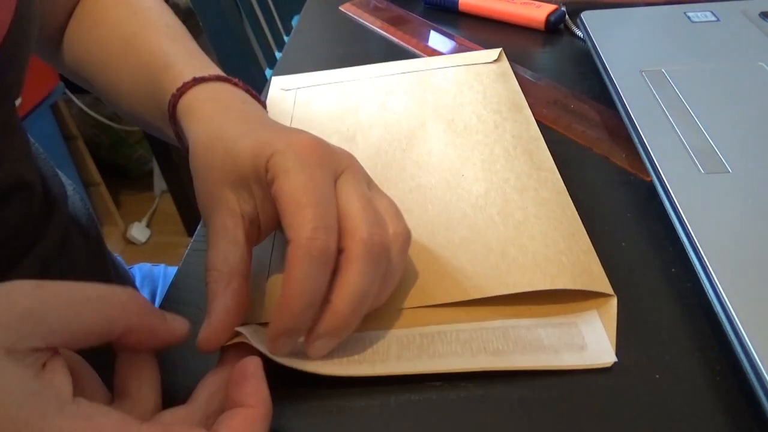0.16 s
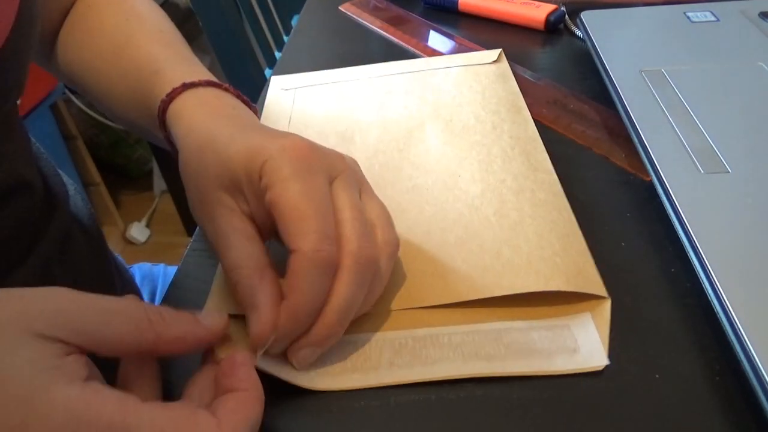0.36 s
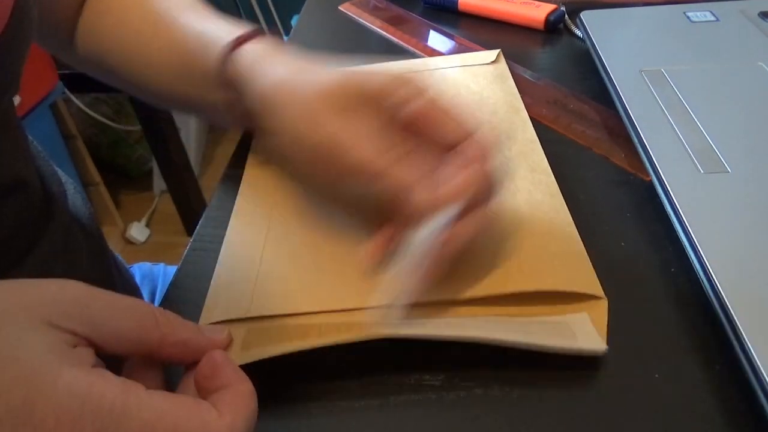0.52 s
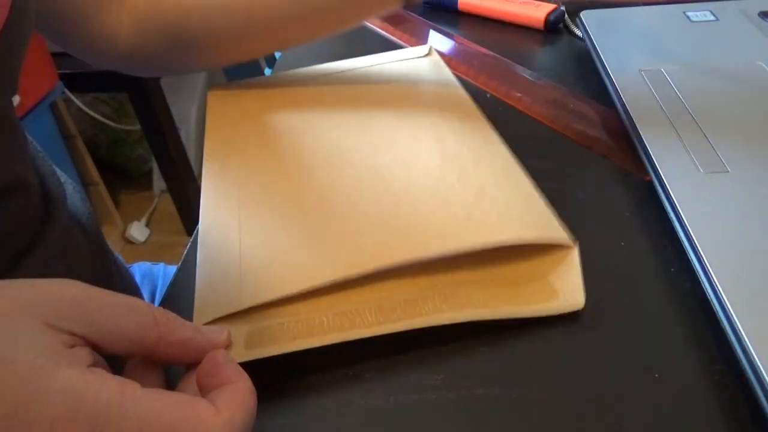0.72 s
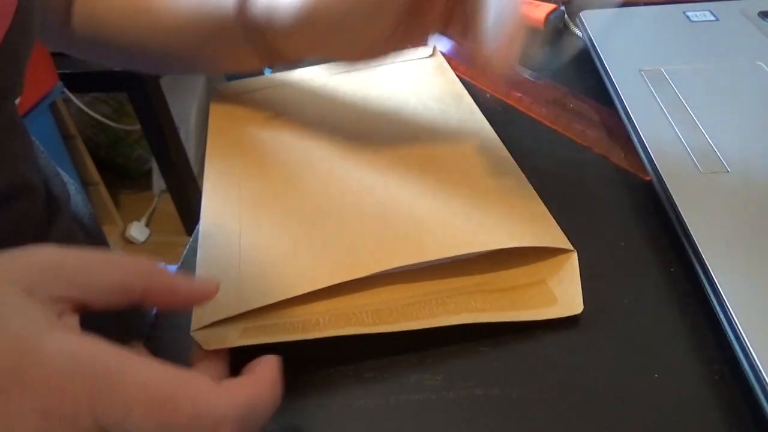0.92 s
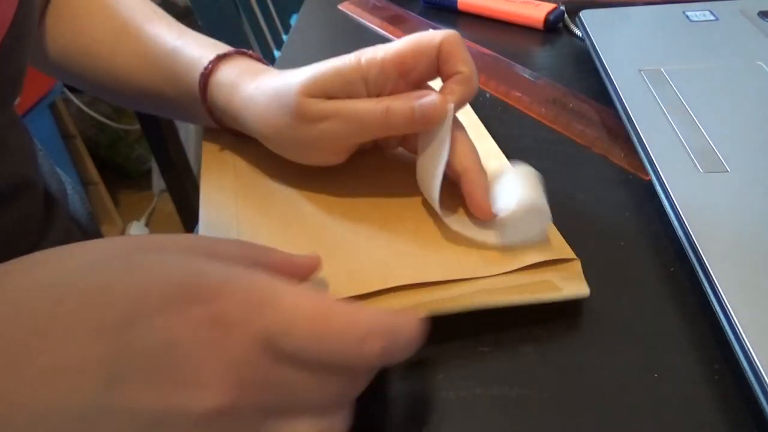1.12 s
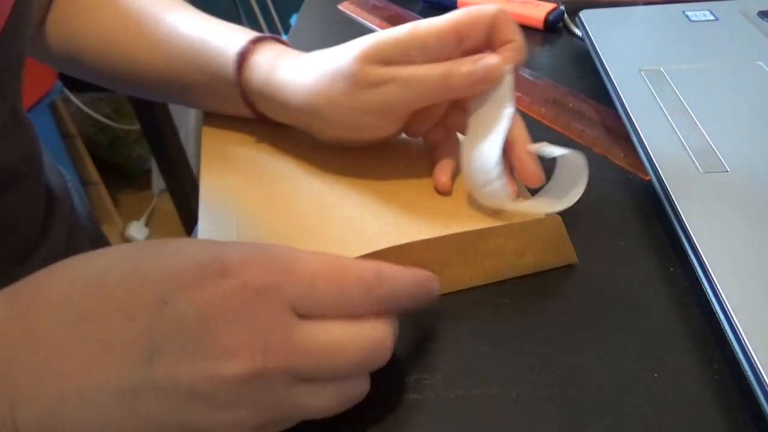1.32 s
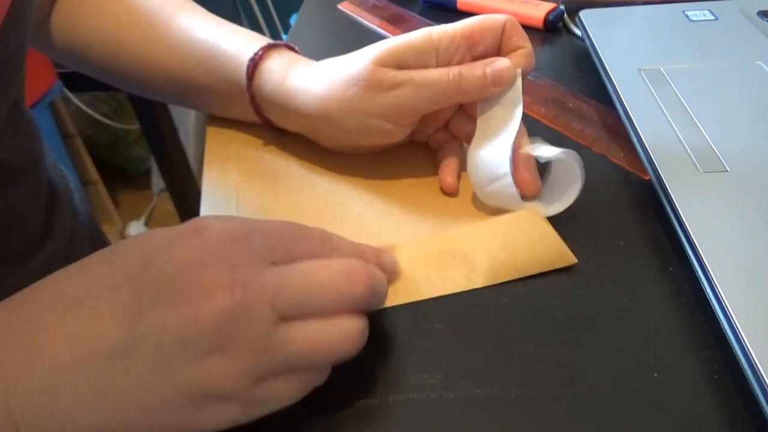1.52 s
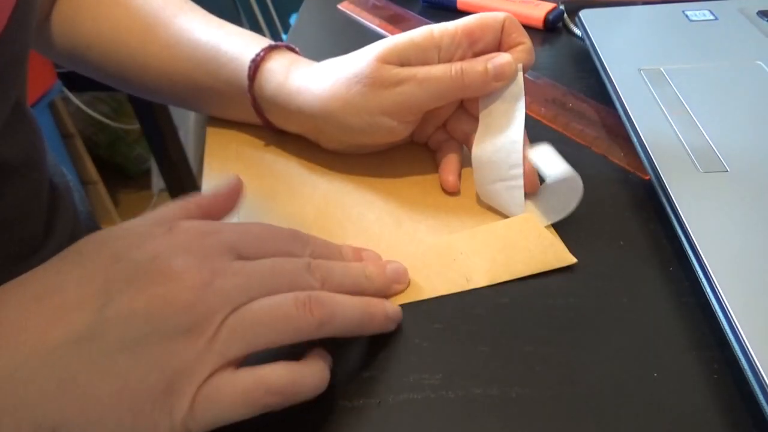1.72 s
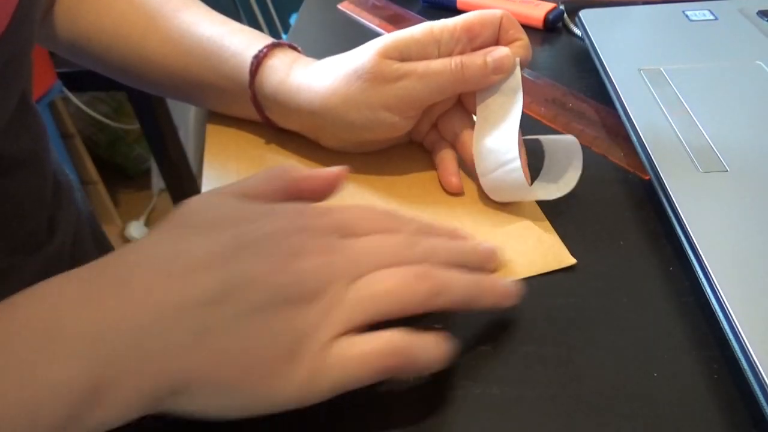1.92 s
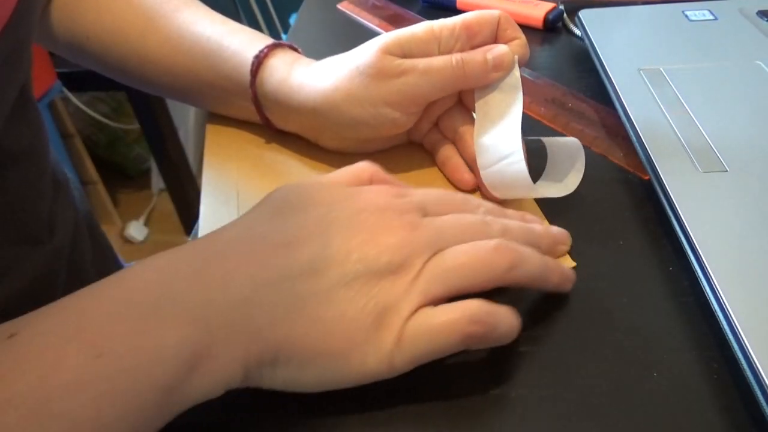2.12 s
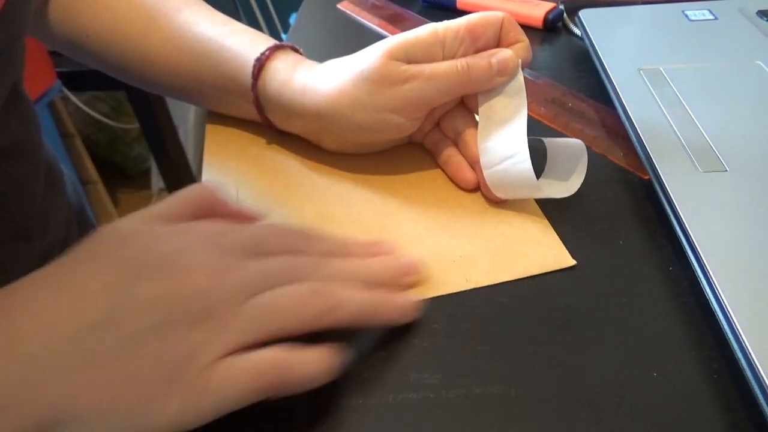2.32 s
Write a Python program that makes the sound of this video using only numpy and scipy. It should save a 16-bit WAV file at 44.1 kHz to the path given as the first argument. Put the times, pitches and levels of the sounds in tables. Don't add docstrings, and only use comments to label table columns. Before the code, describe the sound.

Paper envelope: sticky strip torn away with a quick rasp, flap folded and rubbed smooth

```python
import sys
import numpy as np
from scipy import signal
from scipy.fft import rfft, irfft
from scipy.io import wavfile
from scipy.ndimage import uniform_filter1d

SR = 44100
rng = np.random.default_rng(int(sys.argv[2]) if len(sys.argv) > 2 else 0)


def invert_db(level):
    return 10 ** (np.asarray(level, dtype=float) / 20)


def put_to_file(sound):
    columns = np.atleast_2d(sound).T
    safe = np.clip(columns, -1, 1)
    whole_steps = np.round(safe * 32767)
    wavfile.write(sys.argv[1], SR, whole_steps.astype(np.int16))


N = 103635


def evened(x):
    return x / np.sqrt(np.mean(x ** 2) + 1e-20)


def read(points, hz):
    f, value = np.transpose(points)
    return np.interp(np.log(hz + 1), np.log(f + 1), value)


def colour(x, points):
    log_gain = np.log(invert_db(read(points, abs(np.fft.fftfreq(4096, 1 / SR)))))
    response = np.exp(np.conj(signal.hilbert(log_gain)))
    taps = np.fft.ifft(response).real[:2048]
    return signal.oaconvolve(x, taps, axes=-1)[..., :np.shape(x)[-1]]


def resonate(x, hz, width_hz):
    turn = np.exp(2j * np.pi * np.cumsum(hz * np.ones(len(x))) / SR)
    r = np.exp(-np.pi * width_hz / SR)
    return 2 * (turn * signal.lfilter([1 - r], [1, -r], x / turn)).real


def fibres(per_s, spread_db, lumps_db, lump_s, hiss_db):
    happens = rng.random(N) < per_s / SR
    size = np.minimum(rng.exponential(1, N), 2)
    hiss = rng.standard_normal(N)
    puffs = signal.lfilter([1], [1, -.94], happens * invert_db(spread_db * size)) * hiss
    pole = np.exp(-1 / (lump_s * SR))
    clumps = signal.lfilter([1], [1, -pole], rng.standard_normal(N))
    clumps = evened(signal.lfilter([1], [1, -pole], clumps))
    return evened((evened(puffs) + invert_db(hiss_db) * hiss) * invert_db(lumps_db * clumps))


def effort(rows):
    t, power = np.arange(N) / SR, 0
    for start, rise, hold, db, t60 in rows:
        attack = np.clip((t - start) / rise, 0, 1)
        fall_s = np.maximum(t - start - rise - hold, 0)
        power = power + (attack * invert_db(db - 60 * fall_s / t60)) ** 2
    return np.sqrt(power)


def stroke(rows, tone, drive):
    return effort(rows) * evened(colour(drive, tone))


# start_s, rise_s, hold_s, level_db, fall_t60_s
PEEL = [
    (.52, 0.048, 0.072, -24, 0.15),
    (.575, 0.016, 0.045, -24, 0.25),
    (.63, 0.031, 0.051, -20, 0.12),
    (.72, 0.0013, 0.0079, -30.5, 0.54),
]
# freq_hz, density_db_per_hz
PEEL_TONE = [(35, -76), (80, -39), (200, -18), (398, -11), (900, -3), (1310, 5.5), (1510, 2), (8120, 10.5),
             (16000, -12.5)]
# time_s, slips_per_s
GLUE_RATE = [(.55, 940), (.62, 1800), (.72, 2500)]
# time_s, pitch_hz
STRIP_PITCH = [(.59, 5500), (.615, 5000), (.64, 4250), (.665, 3650), (.69, 3200)]
# start_s, rise_s, hold_s, level_db, fall_t60_s
SHEET = [
    (-.02, 0.011, 0.011, -42, 0.43),
    (.1, 0.015, 0.037, -44.5, 1),
    (.46, 0.032, 0.031, -38, 0.23),
    (.525, 0.056, 0.12, -29, 0.019),
    (.72, 0.014, 0.047, -41.5, 0.27),
    (1.066, 0.0029, 0.015, -47.5, 0.99),
    (1.275, 0.014, 0.046, -38.5, 0.27),
    (1.395, 0.0029, 0.05, -40.5, 0.74),
    (1.55, 0.026, 0.032, -42.5, 0.2),
    (1.72, 0.01, 0.0032, -41, 0.034),
]
# freq_hz, density_db_per_hz
BODY_TONE = [(40, -95), (100, -32), (200, -5), (350, -3), (1000, 3.5), (1700, 2), (2600, 0), (5000, -1),
             (16000, -38)]


def peel():
    t = np.arange(N) / SR
    drive = fibres(np.interp(t, *np.transpose(GLUE_RATE)), 1.5, .8, .001, 2)
    drive = drive / np.sqrt(uniform_filter1d(drive ** 2, size=900))
    pitch_hz, width_hz = np.interp(t, *np.transpose(STRIP_PITCH)), 400
    ring = evened(resonate(drive, pitch_hz, width_hz))
    ring = ring + evened(resonate(drive, 0.53 * pitch_hz, width_hz))
    free = np.clip((t - STRIP_PITCH[0][0]) / 0.072, 0, 1) * (t < STRIP_PITCH[-1][0])
    thump = effort(SHEET) * evened(colour(drive, BODY_TONE))
    return stroke(PEEL, PEEL_TONE, drive) + effort(PEEL) * free * invert_db(-5) * ring + thump


# time_s, peak_db, ring_hz, wide_share_db, thud_share_db
GLUE_SNAPS = [(.0108, -13, 8600, 5, 0.5), (.3677, -7.5, 9140, -6, -41), (.403, -8, 5020, -7, -49),
              (.4604, -29, 7970, -4, -25), (.482, -26, 9100, -7, 0), (.4937, -20, 8500, -8, -20),
              (.5007, -18, 1910, 2, -13), (.5185, -15, 1900, -6, 6), (.5268, -10, 8050, -12, -7),
              (.5345, -9, 8000, -13, -6), (.5388, -5, 1900, -4, -0.5), (.5457, -7, 8300, -15, -10),
              (.5468, -8, 2020, -3, -5), (.5571, -6, 7900, -6, -20), (.5612, -7, 7440, -6, -30),
              (.5715, -19, 8600, -8, -24), (.5791, -4, 9100, -1, -11), (.5846, -19, 9300, -5, -5),
              (.5955, -9, 9300, -4, -8), (.5992, -11, 5640, -3, -3), (.6028, -11, 5100, -22, 4),
              (.6042, -12, 8600, -12, -3), (.6073, -7.5, 8500, 3.5, 0), (.61, -16.5, 2370, 0, -20),
              (.6163, -11, 4940, -3, -11), (.7058, -13, 2770, 6, -9), (.7193, -5.5, 8100, -21, -8),
              (.7949, -26.5, 2000, 2, -3)]
# time_s, peak_db, ring_hz, wide_share_db, thud_share_db
FLAP_SNAPS = [(1.0685, -34, 9200, -4, -4), (1.0774, -27.5, 1160, -3, 7), (1.283, -31, 810, -3, -7),
              (1.2905, -16.5, 8000, -3, -29), (1.293, -6, 8100, -6, -22), (1.2937, -13.5, 6800, -4, -26),
              (1.2957, -19, 4700, 2, -17), (1.44, -18, 1110, -5, 2), (1.4389, -20.5, 2930, -6, 1),
              (1.461, -24, 3940, 2, -8), (1.509, -6, 2600, 4.5, -25), (1.5676, -17, 2600, -6, -3),
              (1.5859, -6, 6100, -14, -11.5), (1.59, -8.5, 6750, -8, -31), (1.595, -7.5, 7200, 17, -23),
              (1.6001, -7, 4300, -15, -10), (1.614, -7.5, 5700, 6, -9), (1.7319, -11.5, 8260, -3, -29),
              (1.7343, -8, 7550, -1, -36), (1.8235, -19, 8200, -2, -30), (1.8442, -21, 4570, 3, -30),
              (1.8874, -24, 4700, 2, -28), (1.8893, -27.5, 2580, -8, -30), (2.007, -25.5, 2900, -13, -4),
              (2.023, -28, 2920, -9, -16)]
# freq_hz, density_db_per_hz
SNAP_TONE = [(150, -69), (900, -10), (1800, -9.5), (5000, 1), (9000, -2.5), (12000, -13.5), (16000, -40.5)]
SNAP_BAND = [330, 12500]


def snaps():
    out, t = np.zeros(N + 2000), np.arange(1500) / SR
    t60_s, ring_q, edge_db = .007, 3, 8
    band = signal.butter(2, SNAP_BAND, 'band', fs=SR)
    for s, db, hz, wide_db, thud_db in GLUE_SNAPS + FLAP_SNAPS:
        edge = invert_db(edge_db) * (t == t[2])
        burst = (rng.standard_normal(len(t)) - edge) * invert_db(-60 * t / t60_s)
        ring = resonate(resonate(burst, hz, hz / ring_q), hz, hz / 2)
        wide = invert_db(wide_db) * evened(colour(burst, SNAP_TONE))
        thud = invert_db(thud_db) * evened(colour(burst, BODY_TONE))
        snap = signal.lfilter(*band, evened(ring) + wide + thud)
        out[round(s * SR):][:len(t)] += invert_db(db) * snap / abs(snap).max()
    return out[:N]


# start_s, rise_s, hold_s, level_db, fall_t60_s
PICK = [
    (-.05, 0.054, 0.087, -36, 1),
    (.08, 0.053, 0.13, -31.5, 0.93),
    (.284, 0.0069, 0.021, -26.5, 0.29),
    (.34, 0.012, 0.037, -36, 0.73),
    (.452, 0.0062, 0.012, -28, 0.084),
    (.49, 0.02, 0.012, -35.5, 0.32),
]
# freq_hz, density_db_per_hz
PICK_TONE = [(150, -102), (1100, -32), (1750, -4), (2900, -12), (5000, -1), (6300, -7), (8800, -2.5),
             (16000, -25.5)]


def pick():
    return stroke(PICK, PICK_TONE, fibres(1500, 1.5, .8, .006, 6))


# start_s, rise_s, hold_s, level_db, fall_t60_s
FOLD = [
    (1.278, 0.025, 0.0034, -27.5, 0.13),
    (1.3, 0.0046, 0.023, -36, 0.62),
    (1.437, 0.0027, 0.012, -39, 1),
    (1.51, 0.056, 0.011, -31.5, 0.071),
    (1.56, 0.05, 0.013, -26, 0.33),
    (1.63, 0.0069, 0.01, -59, 0.15),
    (1.69, 0.0205, 0.028, -30, 0.0077),
    (1.74, .004, 0.0069, -67, 0.15),
]
# freq_hz, density_db_per_hz
FOLD_TONE = [(88, -51), (150, -35), (328, -40), (504, -9.5), (805, -8.5), (1720, 0), (2140, 0.5), (7620, 6),
             (16000, -12)]


def fold():
    return stroke(FOLD, FOLD_TONE, fibres(1400, 1.5, 1.2, .003, 3))


# start_s, rise_s, hold_s, level_db, fall_t60_s
NAIL = [
    (1.821, 0.0042, 0.011, -29.5, 0.02),
    (1.838, 0.0018, 0.0055, -38, 0.01),
    (1.884, .003, 0.0037, -30.5, 0.011),
]
# freq_hz, density_db_per_hz
NAIL_TONE = [(300, -65), (1800, -27), (2500, -4.5), (3300, -3.5), (4700, 2.5), (6500, -10), (8500, 1),
             (16000, -23)]


def nail():
    return stroke(NAIL, NAIL_TONE, fibres(1500, 2, 1, .002, 2))


# start_s, rise_s, hold_s, level_db, fall_t60_s
PALM = [
    (.92, 0.047, 0.0077, -38.5, 0.65),
    (1.066, 0.003, 0.017, -39.5, 0.32),
    (1.12, 0.042, 0.15, -41.5, 0.74),
    (1.87, 0.017, 0.045, -37.5, 0.1),
    (1.92, 0.022, 0.1, -39.5, 0.38),
    (2.08, 0.0088, 0.039, -44, 0.065),
    (2.2, 0.037, 0.088, -42, 0.17),
    (2.27, 0.067, 0.056, -41, 0.28),
]
# freq_hz, density_db_per_hz
PALM_TONE = [(88, -50), (150, -26), (805, -43), (979, -20), (1600, -9), (2600, -3), (5150, 0.5),
             (7770, 8.5), (16000, -6)]


def palm():
    return stroke(PALM, PALM_TONE, fibres(1200, 1, .8, .004, 7))


# time_s, peak_db, pitch_hz
TAPS = [
    (0.9017, -23, 1460),
    (1.124, -40.5, 650),
    (1.203, -36, 710),
    (1.982, -29.5, 1200),
]


def taps():
    out, t = np.zeros(N + 2000), np.arange(1500) / SR
    q, rebound_db, rebound_s = 2.34, -18, 0.00458
    for s, db, hz in TAPS:
        push = t * hz * np.exp(-2 * np.pi * t * hz / q) * np.sin(2 * np.pi * hz * t)
        push = push + invert_db(rebound_db) * np.interp(0.73 * (t - rebound_s), t, push, 0, 0)
        out[round(s * SR):][:len(t)] += invert_db(db) * push / abs(push).max()
    return out[:N]


# start_s, rise_s, hold_s, level_db, fall_t60_s
POCKET = [
    (1.282, .01, .03, -38, .15),
    (1.365, .01, .025, -43, .06),
    (1.4, .004, .028, -39, .03),
    (.5, .01, .03, -40, .05),
]


def pocket():
    pitch_hz, width_hz = 1780, 220
    return effort(POCKET) * evened(resonate(fibres(700, 1.5, 2.5, .005, 0), pitch_hz, width_hz))


# time_s, pitch_hz, level_db
SQUEAK = [(2.09, 737, -62), (2.11, 737, -56), (2.21, 737, -59), (2.24, 709, -53), (2.285, 700, -63),
          (2.305, 650, -58), (2.35, 650, -57)]
# time_s, pitch_hz, level_db
CHIRP = [(1.77, 730, -62), (1.85, 733, -58)]


def squeak(curve):
    t, (s, hz, db) = np.arange(N) / SR, np.transpose(curve)
    waver = evened(uniform_filter1d(rng.standard_normal(N), size=300))
    phase = 2 * np.pi * np.cumsum(np.interp(t, s, hz) * (1 + 0.0043 * waver)) / SR
    wave = np.sin(phase) + invert_db(-15) * np.sin(2 * phase)
    return np.sqrt(2) * invert_db(np.interp(t, s, db, -120, -120)) * wave


# freq_hz, t60_s
WALLS = [(200, 0.48), (3000, 0.27), (14000, 0.24)]


def walls(x):
    hz, t, z = signal.stft(rng.standard_normal(SR // 2), SR, nperseg=256)
    decay = invert_db(-60 * t / read(WALLS, hz)[:, None])
    tail = signal.istft(z * decay, SR, nperseg=256)[1]
    tail = tail * np.clip(np.arange(len(tail)) / SR / 0.0026, 0, 1)
    return signal.fftconvolve(x, tail / np.linalg.norm(tail))[:N]


# freq_hz, density_db_per_hz
AIR_TONE = [(25, -19), (60, -21), (300, -3.5), (600, -0.5), (1400, -3), (3000, -11.5), (9000, -15),
            (16000, -33)]
# pitch_hz, level_db
HUM = [(98, -79.), (160, -79.), (500, -72.)]


def air():
    hum = sum(invert_db(db) * evened(resonate(rng.standard_normal(N), hz, 4.4)) for hz, db in HUM)
    return invert_db(-56.5) * evened(colour(rng.standard_normal(N), AIR_TONE)) + hum


# freq_hz, level_db
APART = [(100, -29), (300, -21), (1400, -18), (3000, -16.5), (5500, -14.5), (8000, -14.5), (9500, -21.5),
         (14000, -25)]


def scene():
    paper = pick() + peel() + fold() + palm() + pocket() + snaps() + taps() + nail()
    paper = signal.lfilter(*signal.butter(2, 150, 'high', fs=SR), paper)
    room = invert_db(-16) * walls(paper) + air() + squeak(SQUEAK) + squeak(CHIRP)
    mid = paper + room
    apart = invert_db(-5) * paper + invert_db(11) * room
    smear = rfft(rng.standard_normal(2048) * invert_db(-60 * np.arange(2048) / SR / .03))
    smear = irfft(smear / np.sqrt(uniform_filter1d(abs(smear) ** 2, size=9)))
    side = colour(signal.oaconvolve(apart, smear / np.linalg.norm(smear))[:N], APART)
    return np.array([mid + side, mid - side])


def low_pass(x):
    return signal.sosfilt(signal.butter(12, 17000, fs=SR, output="sos"), x)


def record(dry):
    ceiling, edge_hz = .62, 15800
    soft = dry / (1 + (dry / ceiling) ** 4) ** .25
    mix = signal.oaconvolve(soft, signal.firwin(255, edge_hz, fs=SR)[None], "same")
    return low_pass(mix)


dry = scene()
out = record(dry)
put_to_file(out)
```